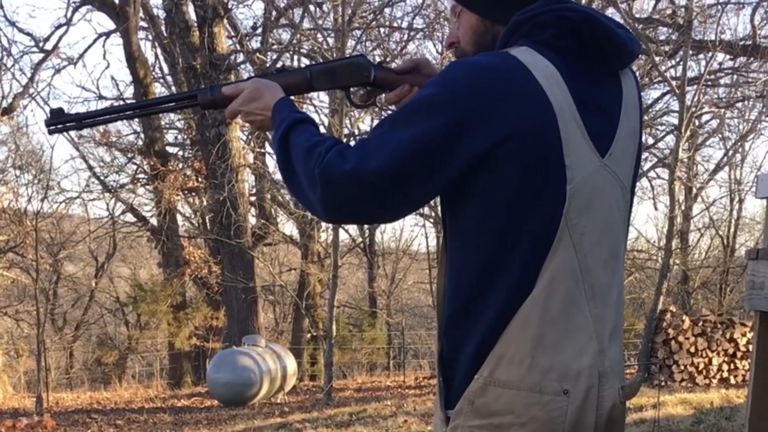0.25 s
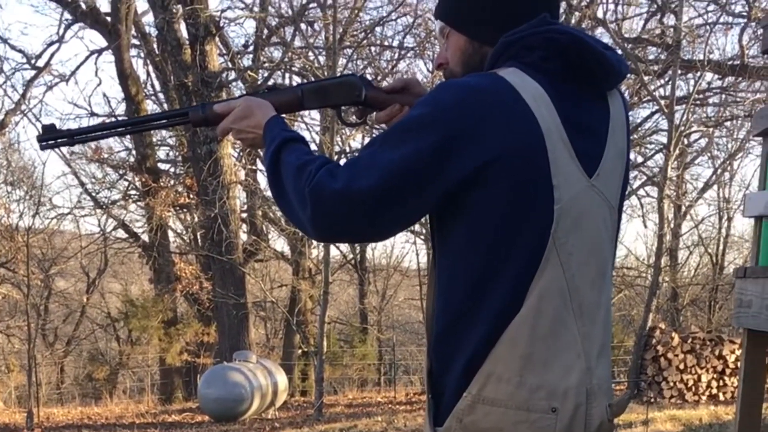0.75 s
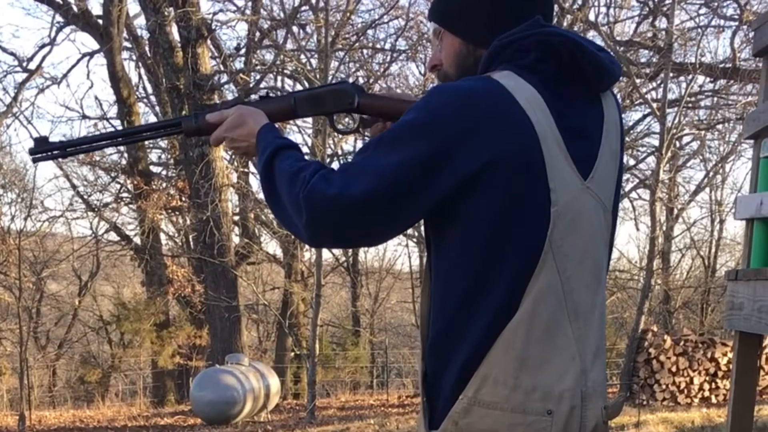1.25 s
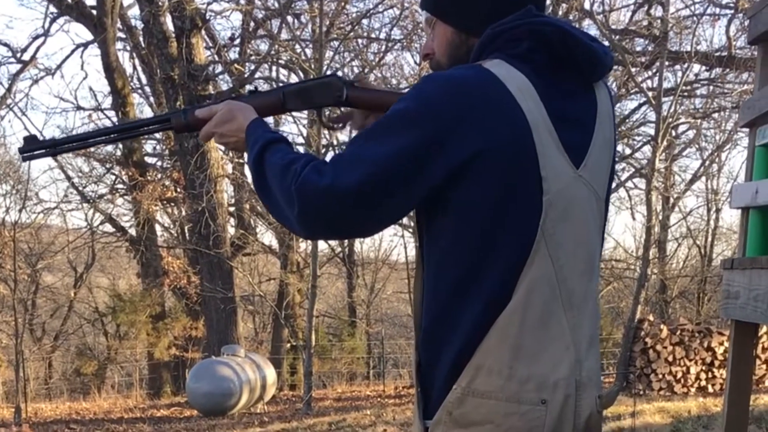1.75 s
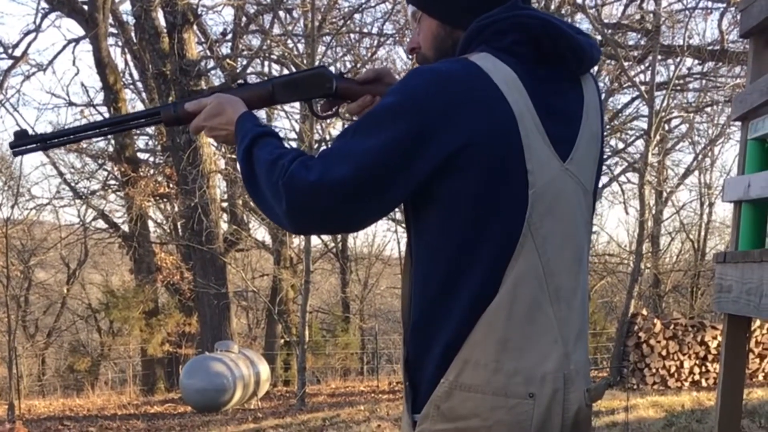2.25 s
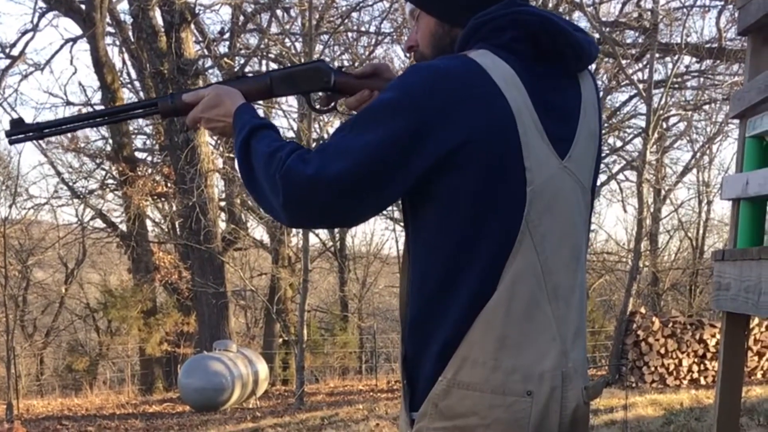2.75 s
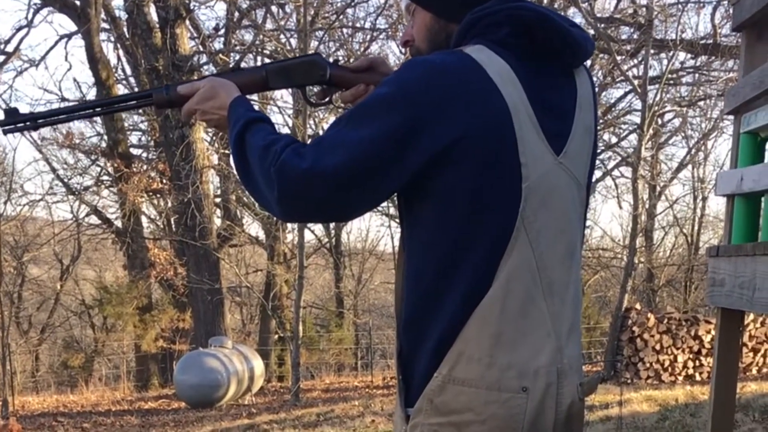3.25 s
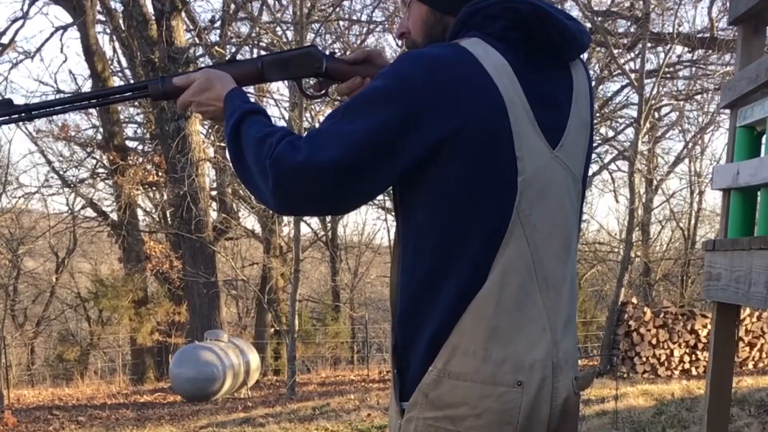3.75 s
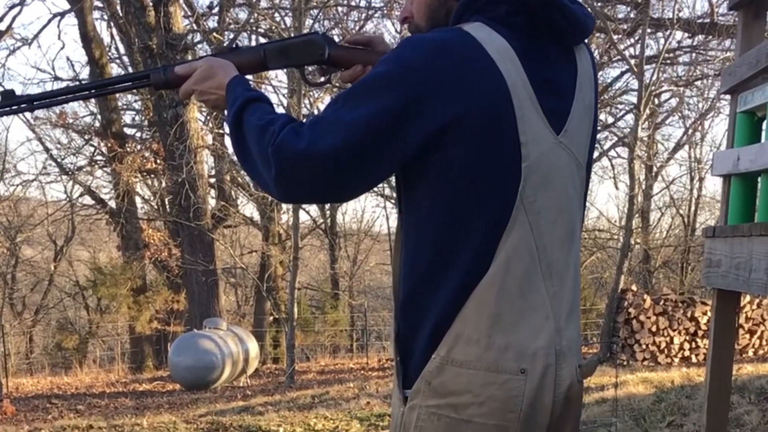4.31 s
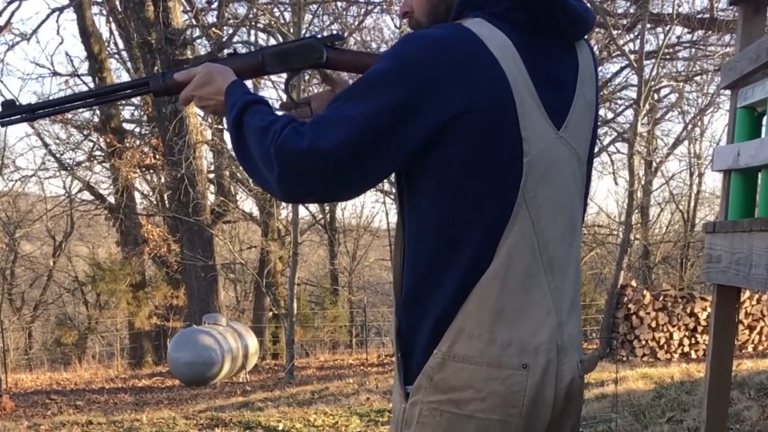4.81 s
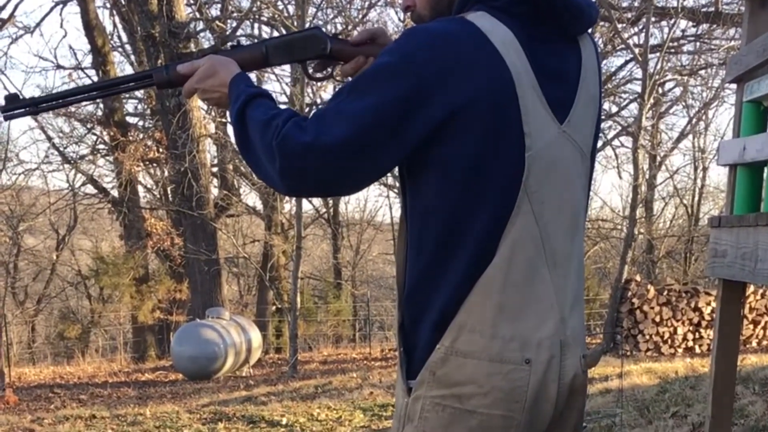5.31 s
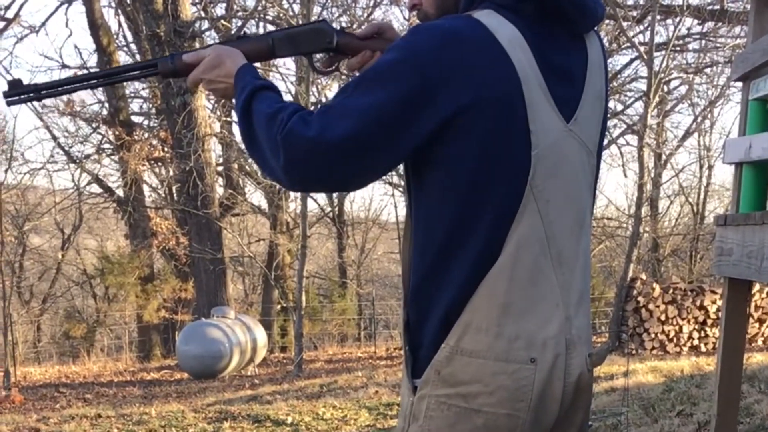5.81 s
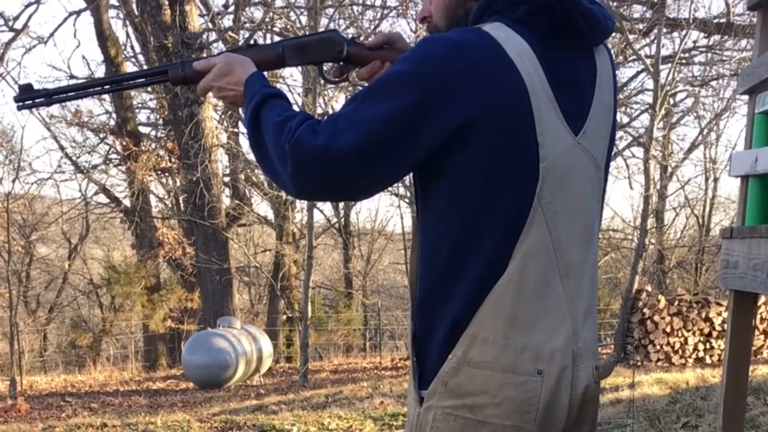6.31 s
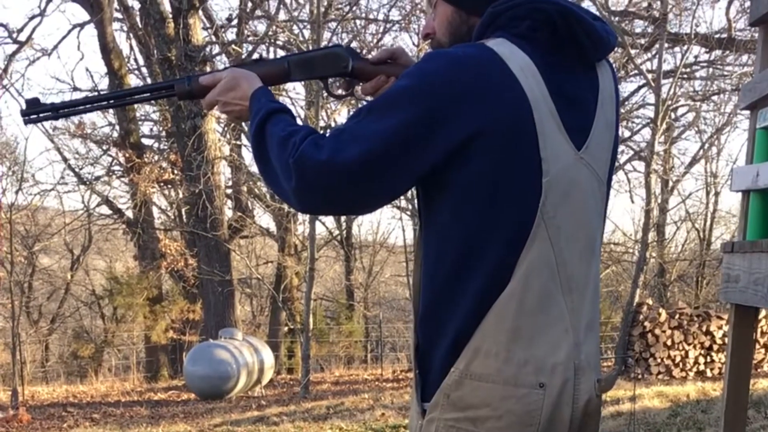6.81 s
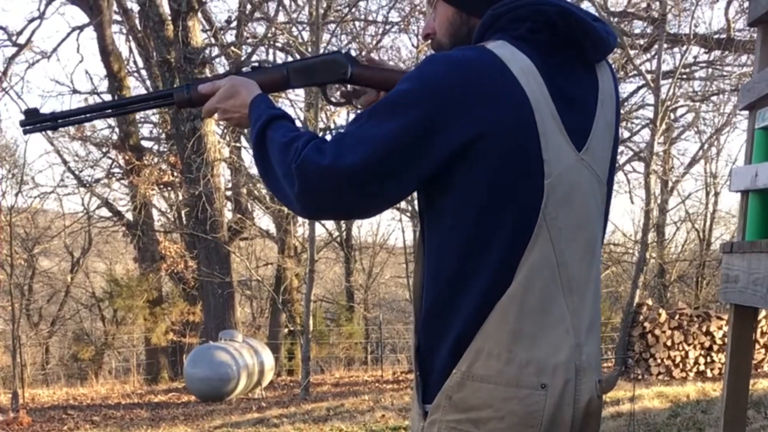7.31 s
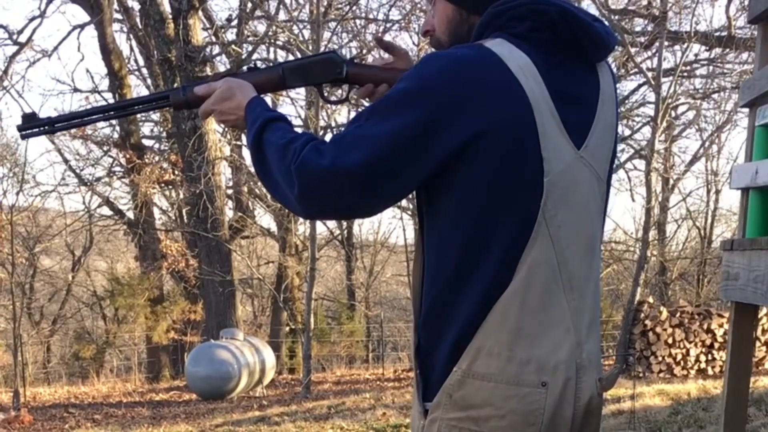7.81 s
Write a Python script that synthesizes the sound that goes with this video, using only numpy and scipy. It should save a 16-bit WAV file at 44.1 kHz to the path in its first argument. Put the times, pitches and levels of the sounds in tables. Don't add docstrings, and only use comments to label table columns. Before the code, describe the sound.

Close outdoor view of a small rifle firing three times, about three seconds apart. Each sharp, slightly overloaded crack is met at once by a short bright steel clang, then clustered slap echoes and a fading valley roll. Under a second later the lever clacks open and slams shut, with tiny brass tinkles. Faint road wash and low hum fill the gaps.

```python
import sys
import numpy as np
from scipy import signal
from scipy.io import wavfile
from scipy.ndimage import uniform_filter1d

SR = 44100
rng = np.random.default_rng(int(sys.argv[2]) if len(sys.argv) > 2 else 0)


def boost_factor(decibels):
    exponent = np.asarray(decibels, float) / 20
    return 10 ** exponent


def file_out(sig):
    cols = np.atleast_2d(sig).T
    lim = np.clip(cols, -1, 1)
    pcm = np.round(lim * 32767).astype(np.int16)
    wavfile.write(sys.argv[1], SR, pcm)


N = 355446
NEAR_S = .03

FIRED = [.7194, 3.8827, 6.808]
# pitch_hz, density_db (per Hz)
ROAR = [(120, -12), (280, -6.5), (420, -9), (877, -14), (1190, -2), (1310, -9.5), (1530, -3), (3410, -8),
        (13000, -13.5), (15700, -15.5), (16500, -32)]
# pitch_hz, density_db (per Hz)
VALLEY = [(88, -40.5), (150, -11.5), (400, -20), (700, -4.5), (1400, -2), (2000, -8), (3000, -19),
          (8000, -38.5), (17600, -100)]
# pitch_hz, width_hz, level_db
STEEL = [(3410, 430, -6), (4226, 500, -2.5), (6660, 1800, 3), (8900, 3600, -4)]
# pitch_hz, width_hz, level_db
SPARKLE = [(10850, 1500, -2.5), (12980, 6500, -3), (15400, 1600, -10)]


def evened(x):
    return x / np.sqrt(np.mean(x ** 2) + 1e-20)


def add(mix, s, sound):
    part = mix[round(s * SR):][:len(sound)]
    part += sound[:len(part)]


def seconds(length):
    return np.arange(round(length * SR)) / SR


def noise(count):
    return rng.standard_normal(count)


def coloured(x, points):
    f, db = np.transpose(points)
    log_f = np.log(np.fft.rfftfreq(4096, 1 / SR) + 1)
    half = np.interp(log_f, np.log(f + 1), db) * np.log(10) / 20
    full = np.concatenate([half, half[-2:0:-1]])
    taps = np.fft.ifft(np.exp(np.conj(signal.hilbert(full)))).real[:2048]
    return evened(signal.oaconvolve(x, taps)[:len(x)])


def resonate(x, hz, width_hz):
    turn = np.exp(2j * np.pi * np.cumsum(hz * np.ones(len(x))) / SR)
    r = np.exp(-np.pi * width_hz / SR)
    return 2 * (turn * signal.lfilter([1 - r], [1, -r], x / turn)).real


def body(x, peaks):
    y = sum(boost_factor(db) * resonate(x, hz, width_hz) for hz, width_hz, db in peaks)
    return y / abs(y).max()


def ring(modes, t):
    phases = rng.random(len(modes))
    return sum(boost_factor(db - 60 * t / t60) * np.sin(2 * np.pi * (hz * t + p))
               for (hz, db, t60), p in zip(modes, phases))


def lumps(count, size, depth_db):
    drift = uniform_filter1d(uniform_filter1d(noise(count), size), size)
    return boost_factor(depth_db * evened(drift))


def unroll(rows):
    s, *columns = np.transpose(rows)
    t = np.arange(s[0], s[-1], 1 / SR)
    edge = signal.windows.tukey(len(t), min(.06 / (s[-1] - s[0]), 1))
    return s[0], edge, [np.interp(t, s, c) for c in columns]


def arch(s, length, top):
    u = np.linspace(0, 1, num=9)
    return s + length * u, np.sin(np.pi * u ** (np.log(.5) / np.log(top)))


def tone(rows, waver, octave_db):
    s, edge, (hz, db) = unroll(rows)
    wobble = 1 + waver * evened(uniform_filter1d(noise(len(hz)), 2000))
    turns = 2 * np.pi * np.cumsum(hz) / SR
    return s, edge * wobble * boost_factor(db + 3.5) * (np.sin(turns) + boost_factor(octave_db) * np.sin(2 * turns))


def patchy(x):
    z = signal.stft(x, nperseg=1024)[2]
    field = uniform_filter1d(rng.standard_normal(z.shape), size=9, axis=0)
    field = uniform_filter1d(field, size=10, axis=1)
    return evened(signal.istft(z * boost_factor(2.0 * evened(field)), nperseg=1024)[1][:len(x)])


def far_wash(t):
    # loudest_s, level_db, rise_db_per_s, fall_db_per_s
    swells = [
        (0.0, -61, 8, 5),
        (2.45, -60.5, 7, 7),
        (5.65, -57.5, 9.5, 8.5),
        (7.35, -61, 25.5, 8),
    ]
    # pitch_hz, density_db (per Hz)
    wash = [(88, -38), (150, -4.5), (198, -4), (232, 0.5), (286, -18), (363, -10), (442, -16), (710, -1.5),
            (1050, -4.5), (1410, -6.5), (3070, -28), (3500, -28.5), (4550, -59), (7700, -120)]
    power = 0
    for s, db, rise, fall in swells:
        power = power + boost_factor(2 * (db - rise * np.maximum(s - t, 0) - fall * np.maximum(t - s, 0)))
    return np.sqrt(power) * patchy(coloured(noise(N), wash))


def rumble(t):
    # time_s, level_db
    contour = [(0, -63), (3.0, -61), (5.0, -63), (5.5, -60.5), (6.2, -58), (6.7, -54.5), (7.2, -55),
               (8.06, -53.5)]
    low = np.diff(noise(N), prepend=0)
    low = resonate(resonate(low, 61, 33), 58, 45)
    return boost_factor(np.interp(t, *np.transpose(contour))) * evened(low)


def hiss():
    # pitch_hz, density_db (per Hz)
    spectrum = [(100, -13), (1500, 0.5), (4000, 5), (9000, 0.5), (15400, -1), (16300, -32)]
    return boost_factor(-76.5) * coloured(noise(N), spectrum)


def tyre_whine(mix):
    # start_s, length_s, start_hz, end_hz, level_db
    whines = [
        (0, 0.498, 1948, 1972, -67),
        (2.95, 0.57, 1772, 1900, -68.5),
        (3.1, 0.356, 1948, 2287, -72),
        (5.55, 0.474, 1780, 1936, -69),
        (6.404, 0.373, 1590, 1777, -64),
        (6.55, 0.27, 1900, 2056, -68),
    ]
    for s, length, hz, end_hz, db in whines:
        times, hump = arch(s, length, .5)
        levels = db - 8 * (1 - hump)
        s, edge, (hz, db) = unroll(np.c_[times, np.linspace(hz, end_hz, len(hump)), levels])
        add(mix, s, edge * boost_factor(db - 3.0) * evened(resonate(noise(len(hz)), hz, 45)))


def motor_hum(mix):
    # time_s, level_db
    levels = [(0, -62.5), (.56, -57), (1.24, -53.5), (2.07, -52.5), (2.55, -61), (3.211, -48), (3.8, -49.5),
              (4.589, -56), (5.19, -54), (5.72, -50), (6.67, -63), (7.1, -53), (8.06, -56.5)]
    free_hz, sag_hz, sag_s = 115.4, 2.9, 4.6
    rows = [(s, free_hz - sag_hz / (1 + np.exp((sag_s - s) / 0.44)), db) for s, db in levels]
    add(mix, *tone(rows, 0.24, -26.5))


def click(db, knock_db, sparkle_db, t60):
    # pitch_hz, width_hz, level_db
    knock = [(1181, 270, 7.5), (1900, 500, -5.5)]
    t = seconds(.3)
    grit = rng.standard_normal((len(t), 3))
    grit[20] += 4.0
    decay = boost_factor(-60 * t / max(t60, .003)) + .05 * boost_factor(-60 * t / .13)
    afterglow = boost_factor(-44 - 60 * t / .7) * lumps(len(t), size=500, depth_db=2.0)
    burst = np.minimum(t / .0004, 1) * (decay + afterglow)
    parts = zip((knock, STEEL, SPARKLE), (knock_db, 0, sparkle_db), grit.T)
    total = sum(boost_factor(d) * body(burst * n, peaks) for peaks, d, n in parts)
    thin = signal.butter(2, 500, "high", fs=SR)
    return boost_factor(db) * signal.lfilter(*thin, total)


def handling(mix):
    # start_s, peak_db, sparkle_db
    ticks = [(0.16, -58, -13), (0.2232, -56, 0.5), (0.2999, -61, 6), (1.5688, -53.5, -16),
             (1.7107, -35, -14.5), (2.0315, -53.5, 6), (2.045, -55.5, 4), (2.3295, -57, 1.5),
             (2.8795, -57.5, -2), (3.2597, -58.5, -12.5), (3.2994, -58, -14.5), (4.8294, -51, -3),
             (4.836, -44.5, -5.5), (5.09, -63, 2.5), (5.1826, -49.5, 1), (5.196, -49, -4.5),
             (5.2789, -57.5, -17), (5.398, -59, -6), (5.6127, -53.5, -27), (6.5998, -63.5, -14.5),
             (7.6787, -43.5, -9.5), (7.946, -60, 7), (7.974, -61, 8.5)]
    for s, db, sparkle_db in ticks:
        add(mix, s, click(db, -7.5, sparkle_db, 0.0328))


def action(mix):
    # delay_s, peak_db, knock_db, sparkle_db, t60_s
    sear = [
        (0, -31.5, 5.5, -0.5, .008),
        (.0034, -31, 4.5, 0, .008),
        (.012, -32.5, 4, 1.5, .0065),
        (.016, -40, -0.5, -4, 0.0082),
    ]
    unlock = [
        (0, -31, -2.5, 8, 0.0162),
    ]
    eject = [
        (-.021, -32.5, 1.5, 4, 0.047),
        (0, -11.5, -5.5, -27.5, 0.0199),
    ]
    lift = [
        (-.0075, -49, -10.5, 0.5, .017),
        (0, -27.5, -9, -24, 0.047),
        (.017, -38.5, -1.5, -6.5, .017),
    ]
    slam = [
        (-.019, -41.5, 12.5, -4.5, .015),
        (-.006, -26.5, -5, 1, 0.011),
        (0, -5.5, -13.5, -6.5, 0.01645),
        (.0049, -8, -10, -2.5, .02),
    ]
    # start_s, force_db
    trigger = [
        (0.6958, 2),
        (3.8588, -1),
        (6.7841, -5.5),
    ]
    unlocks = [
        (1.4012, 0.21),
        (4.5572, -1.28),
        (7.4212, 0.31),
        (8.0446, -1.33),
    ]
    ejects = [
        (1.4552, -0.63),
        (4.6117, -1.15),
        (7.4879, 1.5),
    ]
    lifts = [
        (1.7049, -.3),
        (4.857, -0.15),
        (7.7296, 1.32),
    ]
    slams = [
        (1.7539, -.2),
        (4.9119, -0.85),
        (7.7855, -2),
    ]
    moves = ((sear, trigger), (unlock, unlocks), (eject, ejects), (lift, lifts), (slam, slams))
    for pattern, times in moves:
        for s, force_db in times:
            for delay, db, *colour in pattern:
                add(mix, s + delay, click(db + force_db, *colour))


def shot(blast_db, swing_hz, swing_db, roar_db):
    t = seconds(.13) - .01
    out = .3 * boost_factor(swing_db) * np.exp(np.minimum(t, 0) / .004) * (t < .0004)
    # delay_s, share, length_s
    for delay, share, long in ((0, 1, .0003), (.0033, .8, .0003), (-.0006, .6, .00006)):
        u = (t - delay - .00008) / long
        onset = -np.exp(u.clip(None, 0) * long / .00007)
        wave = np.cos(1.35 * u) * np.exp(-u.clip(0) / 3)
        out += share * boost_factor(blast_db) * np.where(u > 0, wave, onset)
    late = np.maximum(t - .0004, 0)
    turns = swing_hz * late + 1.17 * (1 - np.exp(-late / .002))
    out -= boost_factor(swing_db) * np.sin(2 * np.pi * turns) * np.exp(-((late - .01) / .016) ** 2)
    rise = (t > -.0027) * (.35 + .65 * np.clip((t - .003) / .002, 0, 1))
    fall = boost_factor(-60 * np.maximum(t - .014, 0) / 0.11)
    return out + boost_factor(roar_db) * rise * fall * coloured(noise(len(t)), ROAR)


def tail(near_db, roll_db, woods_db, fade_db):
    # pitch_hz, density_db (per Hz)
    foliage = [(880, -27.5), (1500, 2), (1810, 0), (2990, -14), (3720, -9.5), (4150, -13), (6040, -16),
               (6670, -11), (7730, -20), (8880, -16), (10400, -22), (11500, -18.5), (15000, -25),
               (15900, -27)]
    treeline_s, rise_s, roll_top_s = 0.181, 0.0756, 0.3995
    t = np.arange(NEAR_S, 2.1, 1 / SR)
    near = boost_factor(near_db - 129 * (t - NEAR_S))
    arrived = np.clip((t - treeline_s) / rise_s, 0, 1)
    early, late = np.maximum(roll_top_s - t, 0), np.maximum(t - roll_top_s, 0)
    roll = arrived * boost_factor(roll_db - 19.5 * early - fade_db * late - 25 * late ** 2)
    woods = arrived * boost_factor(woods_db - 43 * (t - treeline_s - rise_s)) + near * boost_factor(-5)
    draw = rng.random((len(t), 3))
    present = draw[:, 0] < 2500 / SR
    grains = present * boost_factor(-3.0 * np.log(draw[:, 1] + .02)) * np.sign(draw[:, 2] - .5)
    valley = (near + roll) * coloured(grains, VALLEY) * lumps(len(t), size=300, depth_db=1.5)
    trees = woods * lumps(len(t), size=150, depth_db=1.5) * coloured(noise(len(t)), foliage)
    melt = np.minimum(np.linspace(6, 0, len(t)), 1)
    return signal.windows.tukey(len(t), .045) * melt * (valley + trees)


def plate(db, dull_db, hz_favoured, favour_db):
    # pitch_hz, level_db, t60_s
    steel_modes = [(1415, -11, 0.13), (2759.7, -10.5, 0.085), (2847, -11.5, .08), (4595, -8.5, .09),
                   (6715, -8, 0.066), (6868, -1.5, 0.083), (7160, -15, 0.13), (9390, -11, .08),
                   (11460, -18, .13), (12530, -13.5, .12), (13070, -19.5, .11), (14600, -21.5, .13),
                   (2172, -7, 0.023)]
    # pitch_hz, width_hz, level_db
    lingering = [(4540, 40, -6), (6700, 70, -1), (6850, 40, -0.5), (7275, 25, 0), (9300, 200, -8),
                 (11560, 45, -2.5), (12520, 40, -5), (14682, 30, 1)]
    t = seconds(.7)
    linger = boost_factor(-32 - 60 * t / 1.3) * body(noise(len(t)), lingering)
    splash = coloured(noise(len(t)), ROAR) * (boost_factor(-60 * t / 0.018) + 0.13 * boost_factor(-60 * t / 0.42))
    modes = []
    for hz, level_db, t60 in steel_modes:
        octaves = np.log2(hz / hz_favoured)
        modes.append((hz, level_db + favour_db * np.exp(-(octaves / .6) ** 2), t60))
    ringing = .45 * ring(modes, t) * lumps(len(t), size=90, depth_db=2.5)
    return boost_factor(db) * np.minimum(t / 0.00024, 1) * (ringing + 0.5 * boost_factor(dull_db) * splash + linger)


def slap(db, hz, t60, push_db):
    t = seconds(.15)
    u = (t - .001) * hz * 2 * np.pi
    wave = -np.sin(u) * np.exp(-u ** 2 / 14)
    smear = coloured(noise(len(t)), VALLEY) * boost_factor(-60 * t / t60) * (t > .0005)
    push = np.sin(2 * np.pi * 60 * t) * boost_factor(push_db - 60 * t / 0.095)
    return boost_factor(db) * (wave + .24 * smear + push)


def gunfire(mix):
    # blast_db, swing_hz, swing_db, roar_db
    shots = [
        (-6, 47, -5.5, -12),
        (-3.5, 50, -6.5, -11.5),
        (-2, 51.8, -9, -12),
    ]
    # slap_db, push_db
    returns = [
        (0, -27),
        (-1, -40),
        (-7, -34),
    ]
    # near_db, roll_db, woods_db, fade_db_per_s
    echoes = [
        (-31, -36, -41.5, 27),
        (-30, -33.5, -39.5, 29),
        (-36, -38.5, -42, 32),
    ]
    # delay_s, peak_db, centre_hz, smear_t60_s
    slopes = [(.1355, -16, 1500, .06), (.1822, -25, 1450, .04), (.243, -23, 1200, .14),
              (.277, -8, 1150, .06), (.2828, -12, 1600, .16), (.354, -14, 1450, .05),
              (.3895, -17, 1200, .16), (.4655, -21, 1300, .06), (.49, -22, 1300, .12),
              (.5355, -21, 1000, .2), (.603, -26, 1400, .12)]
    for s, row, (back_db, push_db), scatter in zip(FIRED, shots, returns, echoes):
        add(mix, s - .01, shot(*row))
        add(mix, s + NEAR_S, tail(*scatter))
        for delay, db, hz, t60 in slopes:
            add(mix, s + delay - .001, slap(db + back_db, hz, t60, push_db))


def plate_hits(mix):
    # start_s, peak_db, dull_db, favoured_hz, favour_db
    hits = [
        (0.787, -6, 3.5, 2300, 5.5),
        (3.95, -8.5, 4, 1454, 8),
        (6.8775, -5.5, 0.5, 3500, 7),
    ]
    for s, *row in hits:
        add(mix, s, plate(*row))


def bolt_slides(mix):
    # start_s, end_s, level_db
    slides = [
        (1.387, 1.476, -51),
        (1.697, 1.756, -57.5),
        (4.563, 4.61, -56),
        (4.85, 4.918, -56),
        (7.423, 7.494, -60.5),
        (7.729, 7.776, -55),
    ]
    for s, end, db in slides:
        count = round((end - s) * SR)
        grit = noise(count) * lumps(count, size=60, depth_db=6.0) * np.linspace(.4, 1, count)
        add(mix, s, boost_factor(db) * evened(body(grit, STEEL + SPARKLE)))


def case(db, hz, octaves):
    # pitch_hz, level_db, t60_s
    brass = [(2390, 1, 0.049), (2870, -1, 0.092), (4467, -4.5, 0.18), (6964, -9, 0.18), (9400, -4.5, 0.18),
             (10040, -12, 0.16), (12620, -1, 0.17), (13160, -2.5, .12)]
    modes = [(f, max(d - 6 * (np.log2(f / hz) / octaves) ** 2, -80), t60) for f, d, t60 in brass]
    t = seconds(.3)
    leaves = evened(resonate(noise(len(t)), 2800, 1500))
    rustle = min(octaves, 1) * boost_factor(-1.5 - 60 * t / 0.082) * leaves
    return boost_factor(db) * (ring(modes, t) + rustle) * lumps(len(t), size=150, depth_db=2.5)


def spent_cases(mix):
    # start_s, level_db, favoured_hz, spread_octaves
    bounces = [(1.408, -56.5, 12600, .2), (1.46, -54.5, 12600, .2), (1.505, -62, 9400, 0.078),
               (1.535, -65.5, 12600, .2), (1.941, -59, 4390, 0.49), (2.378, -69.5, 6000, 1.1),
               (2.4235, -63, 5000, 1.9), (2.49, -70.5, 9070, 0.53), (3.46, -69.5, 8870, 2.15),
               (5.49, -63.5, 5500, 1.06), (5.529, -68.5, 7000, 1.3), (6.50, -61, 4410, 0.417)]
    for s, *row in bounces:
        add(mix, s, case(*row))


def steps(mix):
    # start_s, level_db, pitch_hz, width_hz, t60_s
    bumps = [
        (6.092, -45, 250, 100, .5),
        (6.095, -51, 450, 200, .5),
        (6.10, -60, 2000, 2000, .3),
        (7.567, -37, 750, 250, .045),
        (3.11, -62, 3500, 4000, .04),
    ]
    t = seconds(.4)
    for s, db, hz, width_hz, t60 in bumps:
        thud = evened(resonate(resonate(noise(len(t)), hz, width_hz), hz, width_hz))
        add(mix, s, boost_factor(db - 60 * t / t60) * np.minimum(t / 0.0023, 1) * thud)


def dove(mix):
    # start_s, length_s, top_hz, level_db
    coos = [
        (3.197, 0.586, 356.9, -72.5),
        (4.75, 0.34, 374.7, -71.5),
        (5.123, 0.56, 366.4, -67.5),
    ]
    for s, length, hz, db in coos:
        times, hump = arch(s, length, 0.394)
        pitch = hz * (1 - 0.0794 * (1 - hump))
        add(mix, *tone(np.c_[times, pitch, db - 11 * (1 - hump)], 0.26, -35.5))


def second_motor(mix):
    # time_s, pitch_hz, level_db
    run_up = [
        (7.15, 124.7, -58),
        (7.42, 125.3, -54),
        (8.06, 127.4, -50),
    ]
    add(mix, *tone(run_up, 0.147, -35.5))


def background():
    t = np.arange(N) / SR
    out = far_wash(t) + rumble(t) + hiss()
    for source in (tyre_whine, motor_hum, dove, second_motor):
        source(out)
    for s in FIRED:
        out *= boost_factor(-14 * (t > s) * np.exp(-(np.maximum(t - s, 0) / 0.21) ** 2))
    return out


def scene():
    out = background()
    for source in (handling, action, gunfire, plate_hits, bolt_slides, spent_cases, steps):
        source(out)
    return out[None]


def band_limit(x):
    return signal.sosfilt(signal.butter(12, 17150, fs=SR, output="sos"), x)


def record(dry):
    soft = np.tanh(dry / 1.3) * 1.3
    edge = signal.firwin(255, 16250, window=("kaiser", 9), fs=SR)
    return band_limit(signal.oaconvolve(soft, edge[None], "same"))


dry = scene()
out = record(dry)
file_out(out)
```